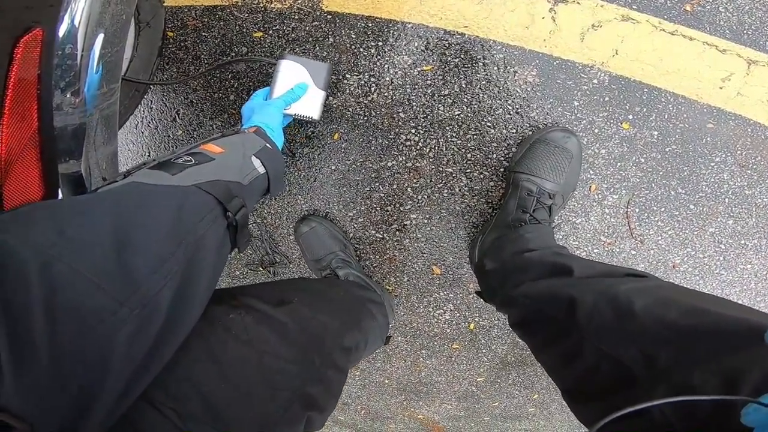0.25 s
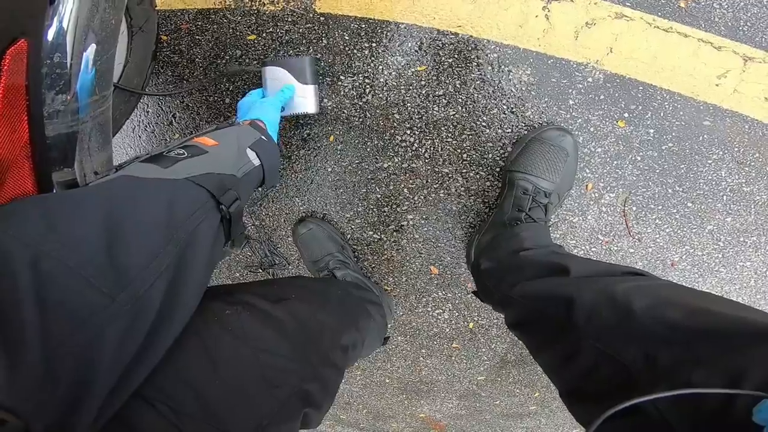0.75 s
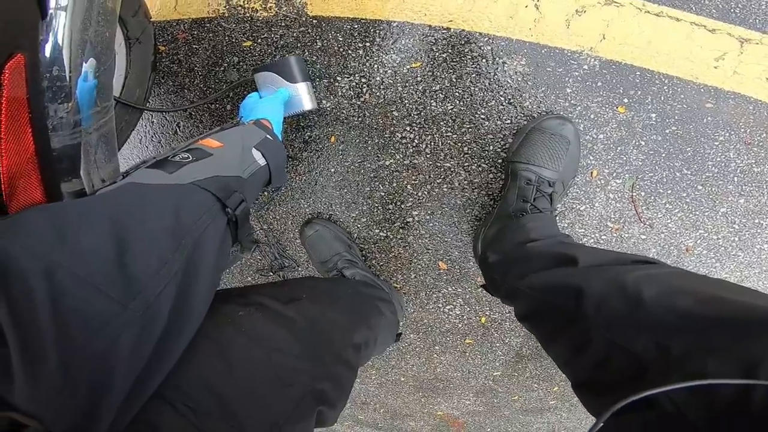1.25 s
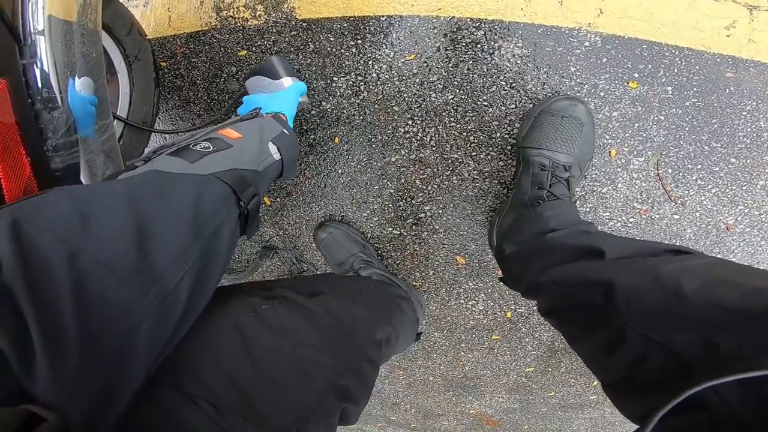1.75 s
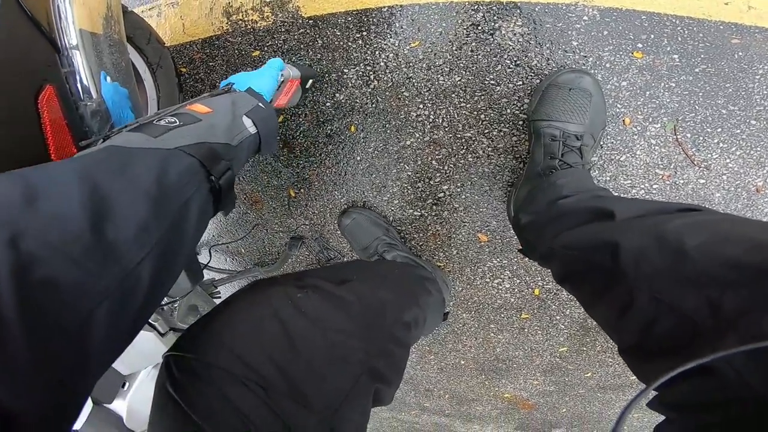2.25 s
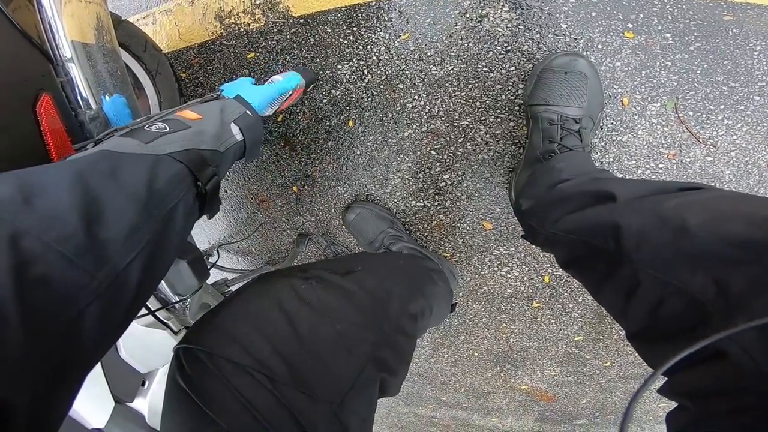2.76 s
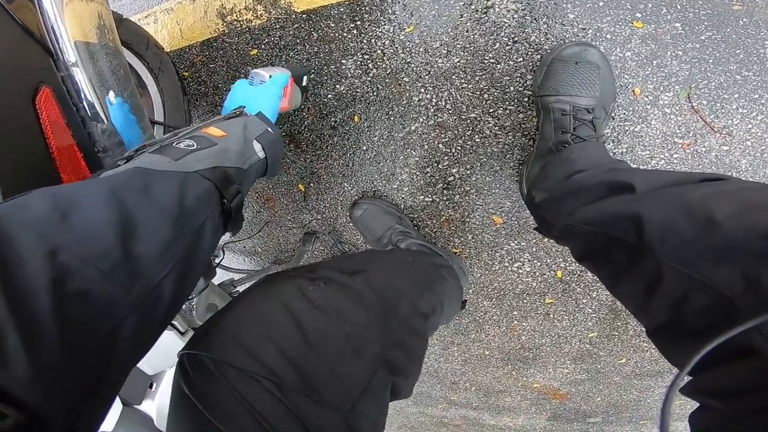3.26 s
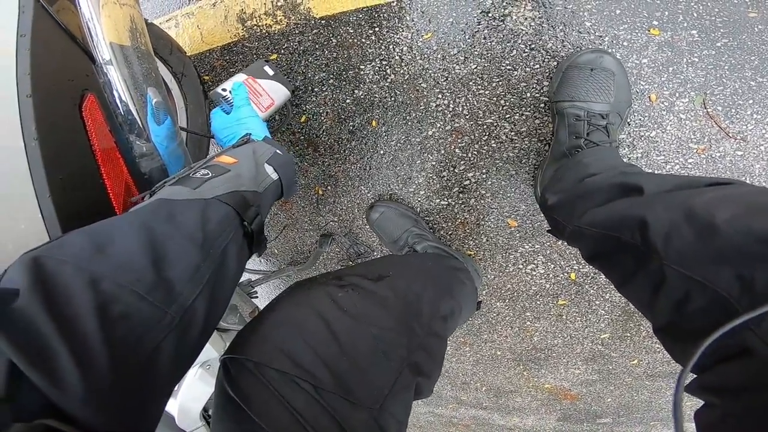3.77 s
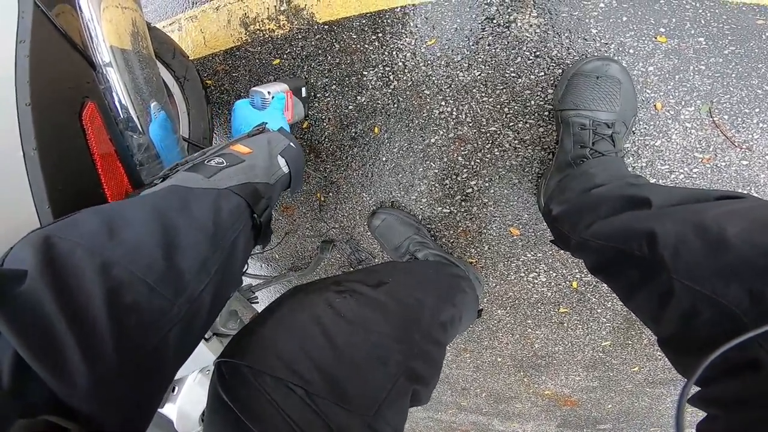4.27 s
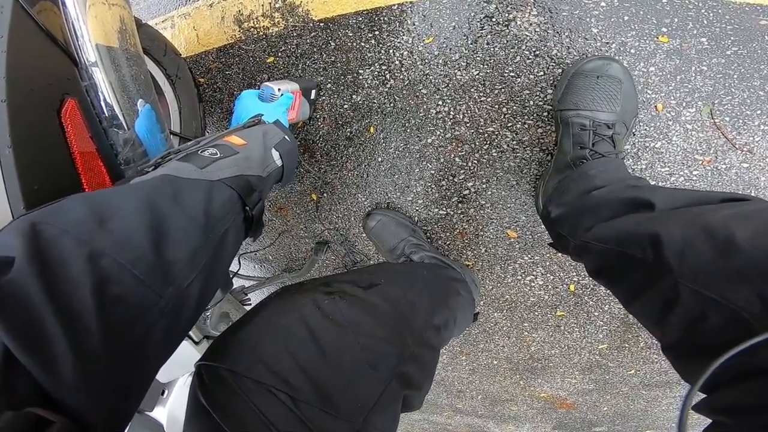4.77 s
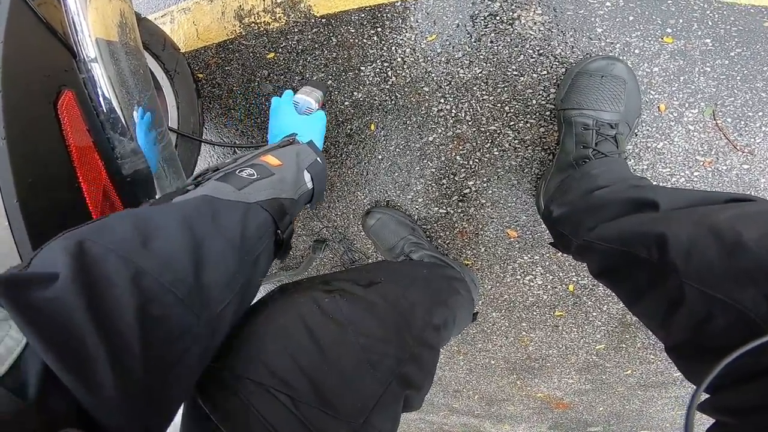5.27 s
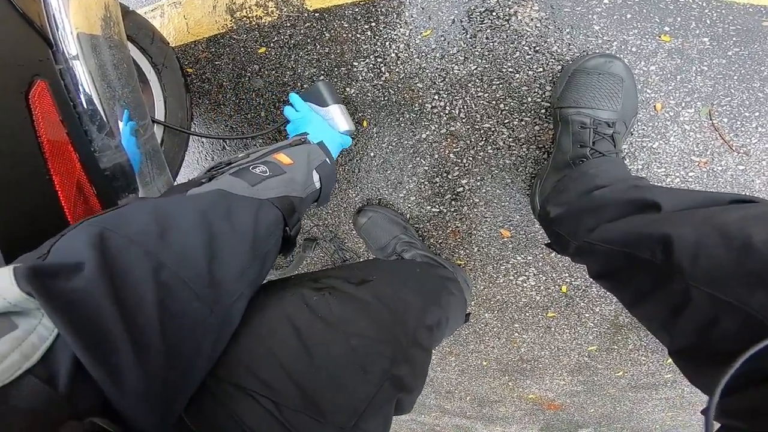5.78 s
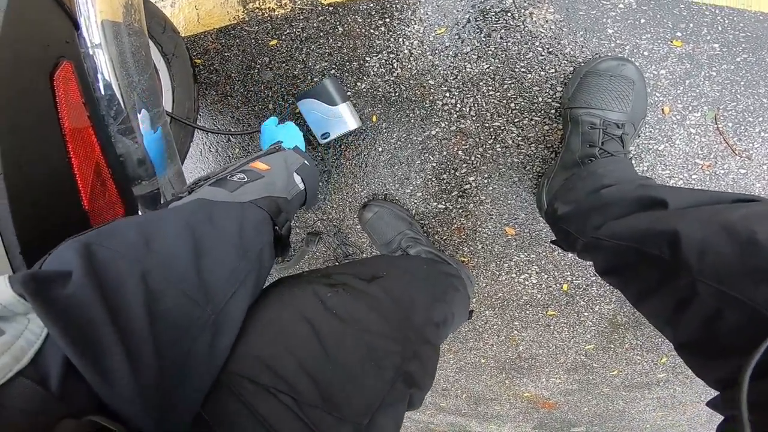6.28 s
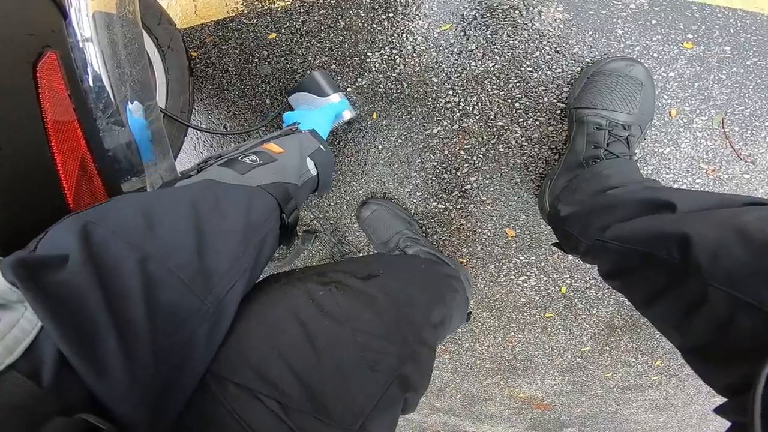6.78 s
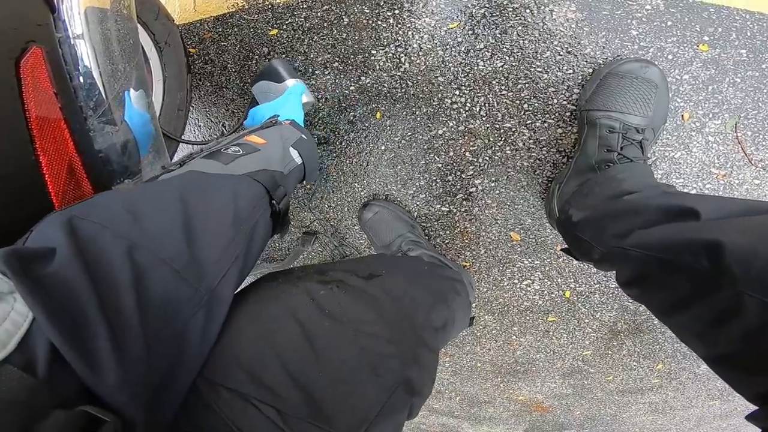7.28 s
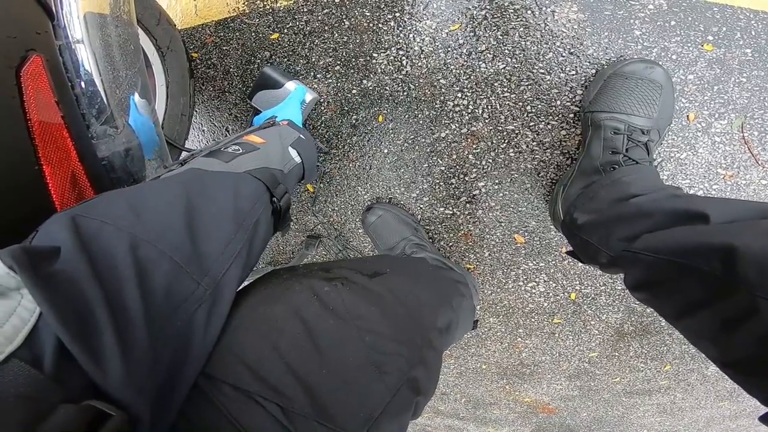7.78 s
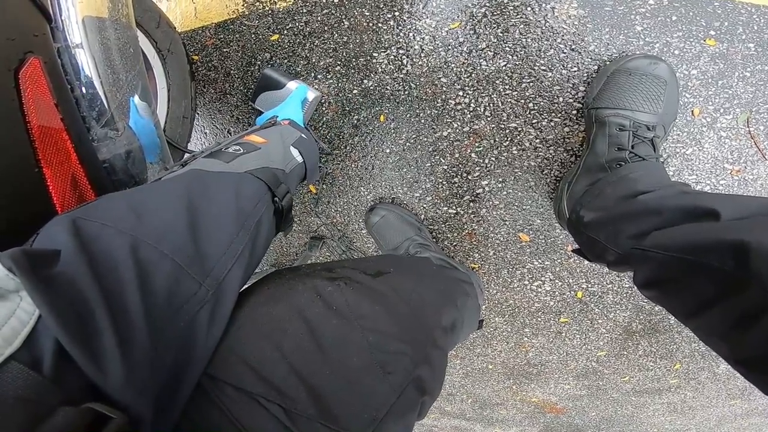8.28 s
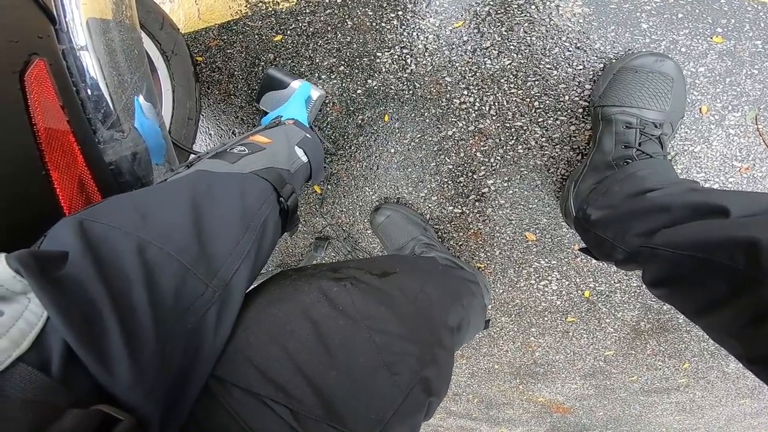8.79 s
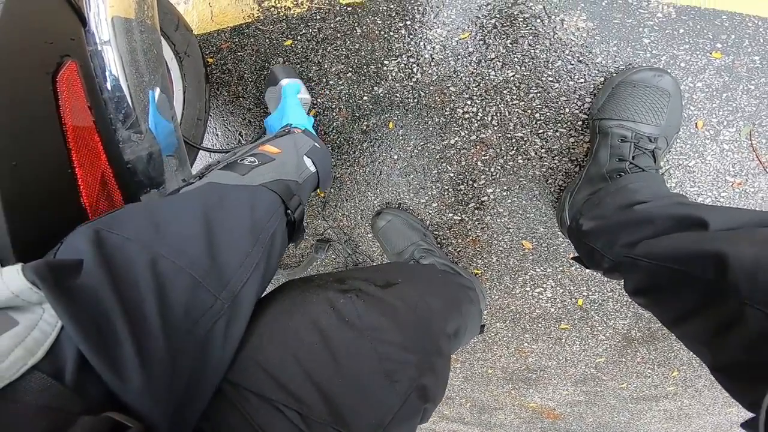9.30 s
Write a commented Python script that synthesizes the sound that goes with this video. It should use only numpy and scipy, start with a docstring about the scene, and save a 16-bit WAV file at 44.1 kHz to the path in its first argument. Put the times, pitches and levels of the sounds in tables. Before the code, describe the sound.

A small electric tyre pump runs close to the microphone for the whole stretch, about ten seconds, outdoors just above the asphalt. Its rapid piston strokes make a steady, rattling buzz in the plastic casing, with hissing air and a thin motor and gear whine. The speed holds nearly constant, but the tone shifts as the pump is turned in the hand. It changes slightly around 2 seconds, becomes thinner from about 3.3 seconds and fills out again by 4.6. The buzz grows a little harder near 6 seconds, shifts slightly around 7, then briefly hollows and turns sharper at about 9.5 seconds. Underneath, a car idles throughout with a low, slightly uneven exhaust throb, over a steady low street rumble.

```python
"""On wet asphalt beside an idling car, one microphone close to a small piston tyre pump held just above
the ground. Valve blows in each stroke ring the plastic casing, air puffs past the valves, and motor and
gear whine under the load. As the hand turns the pump, its colour shifts and the echo off the ground
slides. The exhaust throbs below, over a low street rumble."""
import sys
import numpy as np
from scipy import signal
from scipy.fft import rfft, irfft, next_fast_len
from scipy.io import wavfile
from scipy.ndimage import map_coordinates

SR = 44100
rng = np.random.default_rng(int(sys.argv[2]) if len(sys.argv) > 2 else 0)


def transcribe(signal):
    """Save signal, clipped to [-1, 1], as a 16-bit WAV file at the path in sys.argv[1]."""
    frames = np.atleast_2d(signal).T
    limited = np.clip(frames, -1, 1)
    pcm = np.round(limited * 32767).astype(np.int16)
    wavfile.write(sys.argv[1], SR, pcm)


N = 420713

# How the hand holds the pump: reached at t/s, turn into it/s, echo notch f/Hz, then level/dB
# ahead of the band filters for boom, honk, buzz, rattle, rasp, ring, hiss, fizz, sizzle
POSES = [(0, .1, 2120, -46, -44, -44, -52, -52.5, -60.5, -57, -58, -69),
         (1.8, 0.24, 2210, -46.5, -47, -45.5, -51.5, -54.5, -70, -57, -62, -66.5),
         (2.35, 0.38, 2550, -45, -44.5, -46.5, -53, -53, -70, -56.5, -59.5, -66),
         (3.3, 0.22, 1560, -50.5, -55.5, -49, -54, -51.5, -66, -55.5, -58, -64.5),
         (4.17, 0.15, 2320, -48.5, -50.5, -46.5, -55.5, -57, -70, -55, -57.5, -66),
         (4.6, 0.57, 2240, -46, -46.5, -45, -48.5, -52.5, -71.5, -55, -57, -65.5),
         (5.3, 0.14, 1920, -46.5, -46.5, -46, -53, -52, -67, -59, -59.5, -69.5),
         (5.9, 0.26, 2110, -45, -46.5, -42, -51.5, -53, -63.5, -57, -59, -69.5),
         (6.85, 0.2, 2100, -48, -45.5, -44, -48.5, -56.5, -70, -57.5, -57.5, -67.5),
         (7.5, 0.94, 2250, -47.5, -46.5, -43.5, -51.5, -52, -65, -54.5, -57, -67),
         (9.35, 0.2, 2270, -48, -62, -45.5, -52.5, -54, -67, -56.5, -59, -66),
         (9.52, 0.18, 2450, -52, -48, -40.5, -54, -50.5, -65, -55, -62, -66)]


def amp(db):
    """Decibels to gain."""
    return 10 ** (np.asarray(db) / 20)


def rms_one(x):
    """Scale to unit rms."""
    return x / np.sqrt(np.mean(x ** 2) + 1e-20)


def between(x, low_hz, high_hz):
    """Steep band edges: the casing is deaf between its groups of resonances."""
    return signal.sosfilt(signal.butter(4, [low_hz, high_hz], "band", fs=SR, output="sos"), x)


def drift(hz):
    """Slow random wander of unit rms."""
    r = np.exp(-200 * np.pi * hz / SR)
    slow = signal.lfilter([1], [1, -2 * r, r * r], rng.standard_normal(N // 100 + 2002))[2000:]
    return np.interp(np.arange(N) / 100, np.arange(len(slow)), rms_one(slow))


def cycles(speeds, zero_s):
    """Cycles run since zero_s, from rows of t/s, f/Hz."""
    hz = np.interp(np.arange(N) / SR, *np.transpose(speeds))
    count = np.cumsum(hz) / SR
    return count - count[round(zero_s * SR)]


def held(columns, quickest_turn_s=.2):
    """Each pose keeps its value until the hand turns on, then slides to the next."""
    reached_s, turn_s = np.transpose(POSES)[:2]
    leaves_s = reached_s[1:] - np.maximum(turn_s[1:], quickest_turn_s)
    corners_s = np.sort(np.r_[reached_s, leaves_s])
    return [np.interp(np.arange(N) / SR, corners_s, np.repeat(c, 2)[:-1]) for c in columns]


def valves(crank, scatter_db=.7, scatter_s=.000025, path_shift_s=.00012):
    """Valve blows give four click trains for the casing and the envelope of the air puffs."""
    # Blows in a stroke: crank/turns, relative level/dB (lowest, low, middle, high, puff), puff decay/s
    blows = [(0, 0, -6, -2, -7, -30, .003), (.04, -25, -25, -20, -10, -1, .004),
             (.16, -20, -10, -6, -5, -4, .003), (.22, -12, 0, -9, -2, -12, .003),
             (.34, -25, -12, -6, -3, -5, .003), (.5, -25, -25, -11, -7, -3, .004),
             (.84, -30, -30, -18, -7, -20, .002)]
    clicks, puffs = np.zeros((4, N)), np.zeros(N)
    strokes = np.arange(-1, int(crank[-1]) + 1)
    # each pose moves each valve a little nearer the microphone or further off
    shifts = held(path_shift_s * SR * rng.standard_normal((len(POSES), len(blows))).T)
    for shift, (turn, *casing_db, puff_db, decay_s) in zip(shifts, blows):
        timing, force = rng.standard_normal((len(strokes), 2)).T
        at = np.interp(strokes + turn, crank, np.arange(N), left=-N, right=-N) + scatter_s * SR * timing
        at += shift[np.clip(at, 0, N - 1).astype(int)]
        heard = (at >= 0) & (at < N)
        blow = np.zeros(N)
        blow[at[heard].astype(int)] = amp(scatter_db * force[heard])
        clicks += amp(casing_db)[:, None] * blow
        puffs += amp(puff_db) * signal.lfilter([1], [1, -np.exp(-1 / (decay_s * SR))], blow)
    return [rms_one(c) for c in clicks], puffs


def casing(drive, modes, turn_db):
    """Plastic resonances, at unit rms; each faces the microphone more or less in every pose."""
    out = np.zeros(N)
    facing = held(rng.standard_normal((len(POSES), len(modes))).T)
    for k, (hz, width_hz, level_db) in enumerate(modes):
        r = np.exp(-np.pi * width_hz / SR)
        feedback = [1, -2 * r * np.cos(2 * np.pi * hz / SR), r * r]
        rung = signal.lfilter([1 - r * r, 0, r * r - 1], feedback, drive)
        out += (-1) ** k * amp(level_db + turn_db * facing[k]) * rung
    return rms_one(out)


def ground_echo(x, notch_hz, share=.4):
    """The asphalt returns a copy one and a half notch periods late; loudness stays about the same."""
    late = map_coordinates(x, [np.arange(N) - 1.5 * SR / notch_hz], order=1)
    return (x + share * late) / np.sqrt(1 + share ** 2)


def whine(crank, gear_teeth=41, pinion_teeth=9, lead_turns=.073):
    """Commutator and gear tones swell under each compression stroke."""
    # Motor tones: multiple of motor speed, level/dB before load and pose
    partials = [(3, -54), (4, -70.5), (7, -82), (9, -67)]
    motor = 2 * np.pi * (crank * gear_teeth / pinion_teeth + lead_turns)
    load = 1 + .7 * np.cos(2 * np.pi * (crank - .3))
    waver = .5 * drift(8)
    tones = sum(amp(db + 2 * drift(4.2)) * np.sin(k * motor + waver) for k, db in partials)
    return np.sqrt(2) * load * tones


def pump(strokes_per_s=57.155, rise_per_s2=.0215):
    """Blows and air drive the casing as the crank slowly gains speed; the top bands are mostly air."""
    # Casing resonances, low group to high: f/Hz, width/Hz, level/dB within the group
    boom_modes = [(266.4, 52, -10.5), (558.8, 107, -3), (626.5, 52.3, 4)]
    honk_modes = [(716.5, 84.4, 5.3), (823, 143.5, 2)]
    buzz_modes = [(935.4, 48.4, 5.5), (1084, 49, -0.5), (1236, 150, -2.5)]
    rattle_modes = [(1446, 155, -0.25), (1625, 132, -1.75)]
    rasp_modes = [(1850, 200, 0), (2150, 300, -1), (2410, 80, 2.5), (2640, 140, -8)]
    ring_modes = [(3130, 230, -6), (3440, 100, 6), (3970, 600, -3)]
    hiss_modes = [(4560, 260, 0), (4990, 200, 1), (5400, 220, -1.5), (5900, 240, -1), (6400, 300, -4),
                  (6980, 240, 1), (7470, 260, .5)]
    fizz_modes = [(8130, 486, 0.11), (9007, 620, -0.8)]
    sizzle_modes = [(10030, 630, -5), (12160, 400, 0), (13600, 6200, -14)]
    end_s = N / SR
    crank = cycles([(0, strokes_per_s), (end_s, strokes_per_s + rise_per_s2 * end_s)], zero_s=.0151)
    (lowest, low, middle, high), puffs = valves(crank)
    # lumpy, turbulent flow, and finer, sharper jets at the valve seats
    air = rms_one((puffs + .5) * amp(.8 * drift(120)) * rng.standard_normal(N))
    jets = rms_one((puffs + .12) * amp(2.4 * drift(150)) * rng.standard_normal(N))
    notch_hz, *levels_db = held(np.transpose(POSES)[2:])
    boom_db, honk_db, buzz_db, rattle_db, rasp_db, ring_db, hiss_db, fizz_db, sizzle_db = levels_db
    boom = amp(boom_db) * casing(lowest + .25 * air, boom_modes, turn_db=.6)
    honk = amp(honk_db) * casing(low + .6 * air, honk_modes, turn_db=.6)
    buzz = amp(buzz_db) * casing(middle + .75 * air, buzz_modes, turn_db=1)
    rattle = amp(rattle_db) * casing(middle + .55 * air, rattle_modes, turn_db=1)
    rasp = amp(rasp_db) * casing(high + 1.4 * air, rasp_modes, turn_db=1)
    ring = amp(ring_db) * casing(.1 * high + air, ring_modes, turn_db=1.5)
    hiss = amp(hiss_db) * casing(.2 * high + air + jets, hiss_modes, turn_db=2.3)
    fizz = amp(fizz_db) * casing(.2 * high + .6 * air + jets, fizz_modes, turn_db=2)
    sizzle = amp(sizzle_db) * casing(.2 * high + jets, sizzle_modes, turn_db=1)
    motor = amp(honk_db - honk_db.mean()) * whine(crank)   # leaves by the same side as the honk
    body = boom + honk + ground_echo(buzz - rattle + rasp, notch_hz) + motor
    treble = hiss - fizz + sizzle
    return between(body, 200, 2750) + between(ring, 2750, 4300) + between(treble, 4300, 18000)


def engine(pipe_lag_cycles=.055, uneven_lag_periods=.28):
    """The exhaust's firing beat as suction pulses; unequal cylinders add the multiples in between."""
    # Idle speed: t/s, four-stroke cycle rate f/Hz
    idle = [(0.0, 7.009), (0.65, 6.936), (1.17, 7.064), (1.85, 6.698), (2.21, 7.335), (2.69, 6.894),
            (3.55, 6.989), (3.93, 6.782), (4.73, 7.129), (4.78, 6.837), (5.7, 6.89), (5.99, 7.279),
            (6.64, 6.756), (7.17, 7.048), (7.64, 6.68), (8.23, 7.053), (8.77, 6.712), (9.54, 7.299)]
    # Exhaust tones: multiple of the cycle rate (6 and 12 are the firing beat), mean level/dB
    exhaust = [(3, -66), (6, -45), (8, -68), (9, -54), (10, -63), (11, -60), (12, -39.5), (13, -62),
               (14, -53), (15, -55), (16, -56), (17, -61), (18, -53), (20, -59), (21, -59), (22, -62),
               (23, -65), (24, -65), (26, -69), (30, -69)]
    # The six firings of a cycle: level/dB; their pattern sets only the phases of the tones
    cylinders = [1.5, -2, .9, .5, .6, -1.5]
    cycle = cycles(idle, zero_s=.0087)
    pattern = np.angle(np.fft.fft(amp(cylinders)))
    out = np.zeros(N)
    for order, level_db in exhaust:
        uneven = order % 6 > 0
        gain = amp(level_db + (.3 + .7 * uneven) * drift(4))
        # the pipe delays what lies above the firing beat; the unevenness trails the beat
        lag = pipe_lag_cycles * max(order - 12, 0) + uneven * uneven_lag_periods
        out -= np.sqrt(2) * gain * np.cos(2 * np.pi * (order * cycle - lag) + pattern[order % 6])
    return out


def street_rumble(level_db=-47.5):
    """Steady low noise with next to nothing above its highest listed frequency."""
    # Rumble spectrum: f/Hz, relative level/dB
    spectrum = [(10, -11), (22, -40), (33, -21), (80, -2), (150, -13), (250, -20), (420, -29), (800, -13)]
    points_hz, points_db = np.transpose(spectrum)
    size = next_fast_len(N)
    hz = np.fft.rfftfreq(size, 1 / SR)
    shape = amp(np.interp(np.log(hz + 1), np.log(points_hz), points_db, right=-80))
    noise = irfft(rfft(rng.standard_normal(size)) * shape, size)[:N]
    return amp(level_db) * rms_one(noise)


def scene():
    """Pump, engine and street at one microphone, all running throughout."""
    return (pump() + engine() + street_rumble())[None]


def record(dry, cutoff_hz=15800):
    """A steep low-pass takes off the very top."""
    return signal.sosfilt(signal.ellip(12, .5, 70, cutoff_hz, fs=SR, output="sos"), dry)


dry = scene()
out = record(dry)
transcribe(out)
```